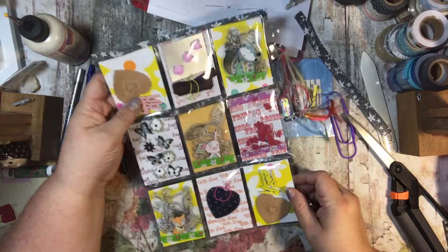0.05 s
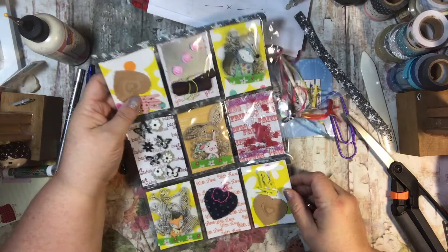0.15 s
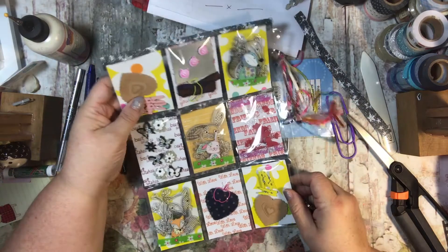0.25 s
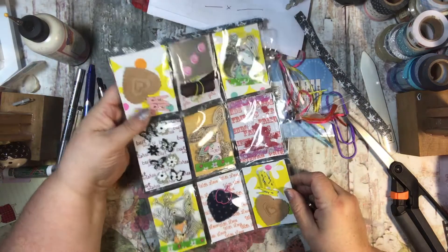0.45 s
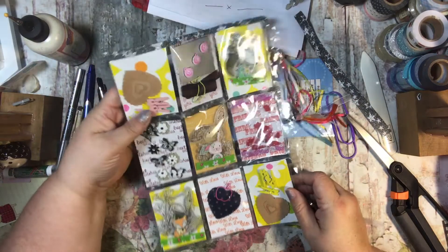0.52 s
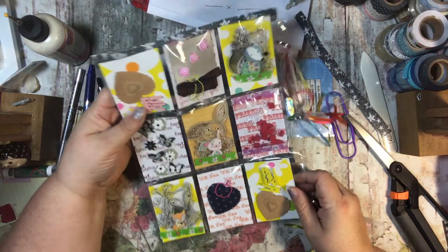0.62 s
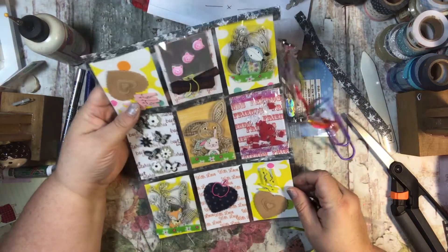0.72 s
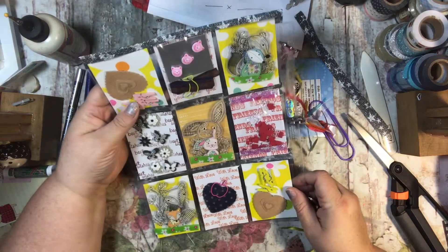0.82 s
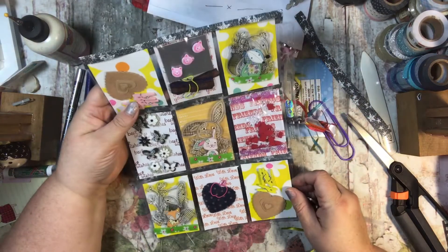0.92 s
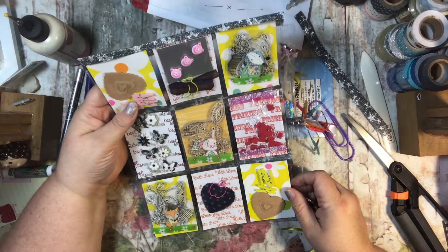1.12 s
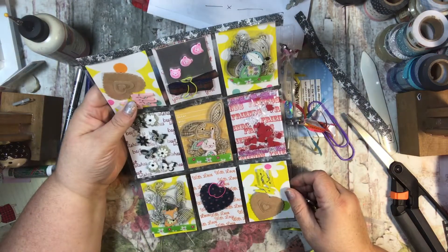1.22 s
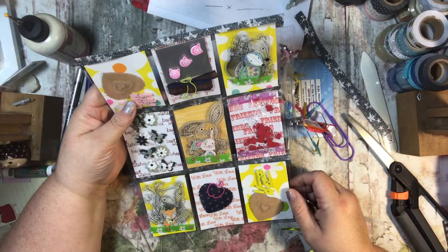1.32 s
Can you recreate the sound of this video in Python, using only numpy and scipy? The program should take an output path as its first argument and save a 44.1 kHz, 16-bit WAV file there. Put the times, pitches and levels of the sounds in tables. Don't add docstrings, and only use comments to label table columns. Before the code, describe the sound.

A clear plastic pocket sheet crinkles in two hands: faint rustle and small ticks first, then sharp irregular snaps, fading to sparse tiny ticks. Close microphone over a desk in a quiet, small-sounding room.

```python
import sys
import numpy as np
from scipy import signal
from scipy.fft import rfft, irfft
from scipy.io import wavfile
from scipy.ndimage import uniform_filter1d

SR = 44100
rng = np.random.default_rng(int(sys.argv[2]) if len(sys.argv) > 2 else 0)


def boost_factor(decibels):
    exponent = np.asarray(decibels, float) / 20
    return 10 ** exponent


def wav_out(sig):
    wavfile.write(sys.argv[1], SR, np.round(np.clip(np.atleast_2d(sig).T, -1, 1) * 32767).astype(np.int16))


N = 59535

# [f/Hz, level/dB per Hz]
AIR_COLOUR = [(30, -33), (55, 4.5), (130, -7), (250, -8), (400, -20), (900, -16), (7000, -26), (16000, -34)]
# [f/Hz, width/Hz, level/dB]
HUM_TONES = [(56.6, 14, -73), (125, 7.4, -73), (237, 28, -77.5)]
# [t/s, level/dB]
RUB_STRENGTH = [(0, -57), (0.098, -58), (0.172, -58.5), (.21, -62), (.31, -61), (.36, -67.5), (.41, -61),
                (.47, -59), (.55, -64), (0.599, -69), (.7, -59.5), (.8, -64), (.86, -68.5), (.92, -82),
                (1.02, -77.5), (1.12, -99), (1.35, -81)]
# [f/Hz, level/dB per Hz]
RUSTLE_COLOUR = [(210, -40), (350, -12.5), (522, -12.5), (1220, -2.5), (1970, -9), (2350, -8.5),
                 (3450, -11), (13400, -26), (16000, -20.5)]
# [f/Hz, width/Hz, level/dB]
SHEET_RESONANCES = [(547, 140, -7.5), (900, 100, -15.5), (1500, 246, -5), (1950, 320, -3.5),
                    (2500, 1100, -9.5), (3570, 1400, -9.5), (4350, 2100, -8.5), (6160, 1500, -13)]
# [t/s, level/dB]
DESK_THUDS = [
    (.0, -49),
    (0.516, -55),
]
# [f/Hz, level/dB, time to fall 60 dB/s]
DESK_MODES = [(84, -4.5, 0.72), (208.4, -1.5, 0.16)]
# [t/s, peak level/dB, pop f/Hz, crack level over pop/dB, crack f/Hz]
CREASE_SNAPS = [(0.2192, -19, 1108, -5, 4310), (0.2374, -40, 1260, -29, 4000),
                (.2685, -36, 2260, -29, 11000), (0.2762, -28, 1360, -0.5, 6000),
                (0.3389, -45.5, 1540, -0.5, 3600), (.4045, -45, 1700, -10, 2500),
                (0.429, -19, 1080, -1.5, 4070), (.4423, -25, 1260, 1.5, 3760), (.524, -34, 2600, 9, 2760),
                (0.606, -37.5, 1100, -13.5, 3000), (.6135, -37, 1190, -20, 3000),
                (0.6456, -35.5, 900, 9.5, 2800), (0.7051, -18.5, 994, -2.5, 4860),
                (0.727, -28, 940, 18, 2300), (.7641, -37.5, 880, 3.5, 3180), (.813, -25.5, 900, 4, 3360),
                (0.9086, -41.5, 1100, 35, 6000)]
# [t/s, peak level/dB, f/Hz]
DULL_POPS = [(0.01, -53.5, 540), (.017, -47, 1400), (0.046, -82, 1870), (.08, -52.5, 780),
             (.088, -43, 1950), (0.135, -51.5, 550), (.156, -51, 1900), (.167, -40.5, 1560),
             (.171, -42, 1900), (.175, -46, 1540), (.183, -50, 1500), (0.382, -54, 1590), (.389, -52, 1070),
             (0.414, -54, 1740), (0.459, -66, 900), (0.486, -47.5, 1040), (.494, -49, 870),
             (.512, -52, 2440), (.524, -56, 380), (0.554, -50.5, 900), (0.5739, -49, 1030),
             (0.662, -51, 820), (.782, -45, 780), (0.788, -57, 740), (.8035, -47, 900), (.88, -59, 850),
             (.995, -63, 900), (1.01, -62.5, 900), (1.074, -61, 1060), (1.092, -63, 950)]
# [t/s, peak level/dB, f/Hz]
BRIGHT_TICKS = [(.0084, -40.5, 5560), (.0404, -70, 9700), (0.0585, -50, 9000), (.1144, -53, 11100),
                (0.1405, -50, 4400), (.1604, -67, 10000), (0.3402, -47, 3950), (0.381, -54, 4400),
                (0.4041, -50, 6800), (0.588, -54.5, 10900), (.6938, -48.5, 9100), (0.7596, -49, 11000),
                (0.77, -44.5, 6440), (0.798, -43, 5500), (0.802, -47, 2780), (0.8527, -46, 6500),
                (.9567, -56.5, 3950), (1.0091, -56, 4000), (1.0331, -62, 5800), (1.13, -63.5, 5000)]
# [f/Hz, level/dB per Hz]
CRACK_COLOUR = [(1500, 13.5), (2500, 3), (4500, -2.5), (7000, -5.5), (10500, -15), (13000, -1.5),
                (16000, -15)]
# [f/Hz, level/dB, time to fall 60 dB/s]
SHEET_RING = [(610, -54, .06), (760, -55, .06), (860, -54, .07), (905, -51, .09), (1010, -53, .06),
              (1150, -54, .05), (1300, -50, .06), (1420, -54, .05), (1620, -54, .05), (2050, -54, .05)]
# [f/Hz, time to fall 60 dB/s]
ROOM_DECAY = [(500, .25), (1000, 0.11), (4000, 0.067), (14000, 0.29)]
# [f/Hz, level/dB]
ECHO_COLOUR = [(400, -2), (900, -9.5), (2000, -1), (6000, -2), (14000, -10.5)]

AIR_DB, ROOM_DB = -72.5, -21
GRAINS_PER_S, GRAIN_SPREAD_DB, HISS_GAIN, CLUMP_DB = 3000, 3.5, 0.9, 1.8
SNAP_WIDTH_OCT, POP_WIDTH_OCT, CRACK_WIDTH_OCT, TICK_WIDTH_OCT = 0.45, 0.24, 0.63, 0.26
POP_TRAVEL_MS, CRACK_TRAVEL_RATIO = 1.75, 0.3
POP_SKIRT_DB, CRACK_SKIRT_DB, CRACK_REACH = -21.5, -5, 3.8
SCATTER_DB, SCATTER_S = -16, 0.0016
LEAD_S, LATE_S = 0.003, 0.001
PULSE_LENGTH = 1024


def rms_one(x):
    return x / np.sqrt(np.mean(x ** 2) + 1e-20)


def at_hz(points, hz):
    table_hz, value = np.transpose(points)
    return np.interp(np.log(hz + 1), np.log(table_hz), value)


def coloured(x, points):
    hz = np.fft.rfftfreq(len(x), 1 / SR)
    return irfft(rfft(x) * boost_factor(at_hz(points, hz)), len(x))


def resonate(x, hz, width_hz):
    r = np.exp(-np.pi * width_hz / SR)
    gain = (1 - r * r) / 2
    return signal.lfilter([gain, 0, -gain], [1, -2 * r * np.cos(2 * np.pi * hz / SR), r * r], x)


def air():
    hum = np.zeros(N)
    for hz, width_hz, db in HUM_TONES:
        tone = resonate(rng.standard_normal(N + SR), hz, width_hz)[SR:]
        hum += boost_factor(db) * rms_one(tone)
    return boost_factor(AIR_DB) * rms_one(coloured(rng.standard_normal(N), AIR_COLOUR)) + hum


def friction_grains(clump_db):
    smooth = uniform_filter1d(rng.standard_normal(N), size=500)
    clumps = rms_one(uniform_filter1d(smooth, size=500))
    size_db = GRAIN_SPREAD_DB * np.minimum(rng.exponential(1, N), 4)
    sizes = boost_factor(size_db) * rng.choice([-1, 1], N)
    slips = rms_one(sizes * (rng.random(N) < GRAINS_PER_S / SR))
    return boost_factor(clump_db * clumps) * (slips + HISS_GAIN * rng.standard_normal(N))


def rustle():
    body = rms_one(coloured(friction_grains(CLUMP_DB / 2), RUSTLE_COLOUR))
    resonances = np.zeros(N)
    for hz, width_hz, db in SHEET_RESONANCES:
        once = resonate(friction_grains(CLUMP_DB), hz, width_hz)
        resonances += boost_factor(db) * rms_one(resonate(once, hz, width_hz))
    s, db = np.transpose(RUB_STRENGTH)
    return rms_one(body + resonances) * boost_factor(np.interp(np.arange(N) / SR, s, db))


def desk():
    out = np.zeros(N)
    for s, db in DESK_THUDS:
        t = np.maximum(np.arange(N) / SR - s, 0)
        soft_start = 1 - np.exp(-t / 0.0025)
        for hz, mode_db, t60 in DESK_MODES:
            fade = boost_factor(db + mode_db - 60 * t / t60)
            out += fade * soft_start * np.sin(2 * np.pi * hz * t)
    return out


def travel(hz, ms):
    bending = 4 * np.pi * ms * 1e-3 * np.sqrt(1000 * hz)
    plain_delay = 2 * np.pi * hz * (LEAD_S - ms * 3e-4)
    return np.exp(-1j * (bending + plain_delay))


def bump(hz, centre_hz, width_oct):
    return np.exp(-0.5 * (np.log2(hz / centre_hz) / width_oct) ** 2)


def bending_wave(pop_hz, pop_oct, crack_db, crack_hz, crack_oct, scatter):
    hz = np.fft.rfftfreq(PULSE_LENGTH, 1 / SR) + 1
    pop_colour = bump(hz, pop_hz, pop_oct) + boost_factor(POP_SKIRT_DB) * bump(hz, pop_hz / 2, 0.87)
    pop = irfft(pop_colour * travel(hz, POP_TRAVEL_MS))

    skirt = boost_factor(CRACK_SKIRT_DB + at_hz(CRACK_COLOUR, hz))
    skirt = skirt / (1 + (crack_hz / hz / 3.23) ** 4)
    skirt = skirt / (1 + (hz / crack_hz / CRACK_REACH) ** 6)
    crack_colour = bump(hz, crack_hz, crack_oct) + skirt
    crack = irfft(crack_colour * travel(hz, CRACK_TRAVEL_RATIO * POP_TRAVEL_MS))
    folds = boost_factor(SCATTER_DB) * scatter * np.exp(-np.arange(len(scatter)) / (SCATTER_S * SR))
    crack = crack + np.convolve(crack, folds)[:len(crack)]

    pulse = pop / np.abs(pop).max() + boost_factor(crack_db) * crack / np.abs(crack).max()
    return pulse / np.abs(pulse).max()


def sheet_ring(snaps):
    rings = np.zeros(N)
    for hz, db, t60 in SHEET_RING:
        r = boost_factor(-60 / (t60 * SR))
        w = 2 * np.pi * hz / SR
        rings += boost_factor(db) * signal.lfilter([0, np.sin(w)], [1, -2 * r * np.cos(w), r * r], snaps)
    return rings


def creases():
    rows = []
    for s, db, hz, crack_db, crack_hz in CREASE_SNAPS:
        rows.append((s, db, hz, SNAP_WIDTH_OCT, crack_db, crack_hz, CRACK_WIDTH_OCT))
    for s, db, hz in DULL_POPS:
        rows.append((s, db, hz, POP_WIDTH_OCT, -28, 4000, CRACK_WIDTH_OCT))
    for s, db, hz in BRIGHT_TICKS:
        rows.append((s, db, 1200, SNAP_WIDTH_OCT, 20, hz, TICK_WIDTH_OCT))
    out = np.zeros(N + SR)
    for s, db, *shape in rows:
        start = int((s + LATE_S) * SR)
        pulse = bending_wave(*shape, rng.standard_normal(400))
        out[start:start + PULSE_LENGTH] += boost_factor(db) * pulse
    out = out[int(LEAD_S * SR):][:N] + 1e-18
    return out + sheet_ring(out)


def room(x):
    t = np.arange(SR // 2) / SR
    tail = np.zeros(len(t))
    edges = 300 * 2 ** np.arange(0, 6, 0.75)
    for low, high in zip(edges, np.append(edges[1:], 17000)):
        hz = np.sqrt(low * high)
        band_filter = signal.butter(2, [low, high], "band", fs=SR, output="sos")
        band = signal.sosfilt(band_filter, rng.standard_normal(len(t)))
        tail += band * boost_factor(at_hz(ECHO_COLOUR, hz) - 60 * t / at_hz(ROOM_DECAY, hz))
    tail *= 1 - np.exp(-(t / 0.004) ** 2)
    return boost_factor(ROOM_DB) * 0.17 * signal.fftconvolve(x, tail)[:N]


def scene():
    snaps = creases()
    return (air() + rustle() + desk() + snaps + room(snaps))[None]


def band_limit(x):
    return signal.sosfilt(signal.butter(12, 16830, fs=SR, output="sos"), x)


def record(dry):
    bass_cut = signal.butter(4, 42, "high", fs=SR, output="sos")
    treble_cut = signal.cheby2(10, 60, 17100, fs=SR, output="sos")
    mix = signal.sosfilt(treble_cut, signal.sosfilt(bass_cut, dry))
    return band_limit(mix)


dry = scene()
out = record(dry)
wav_out(out)
```